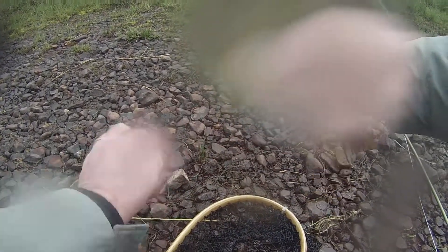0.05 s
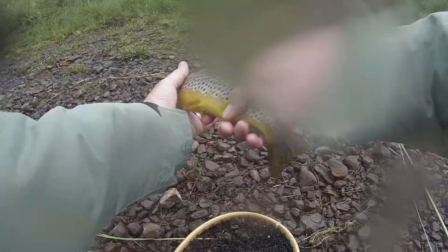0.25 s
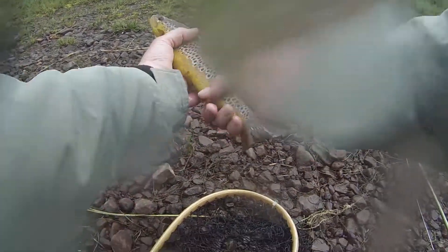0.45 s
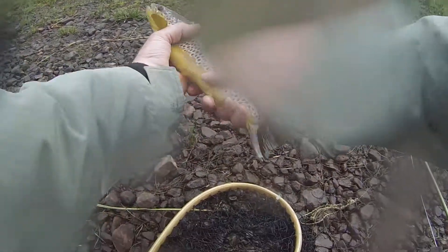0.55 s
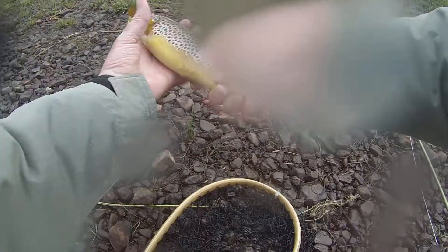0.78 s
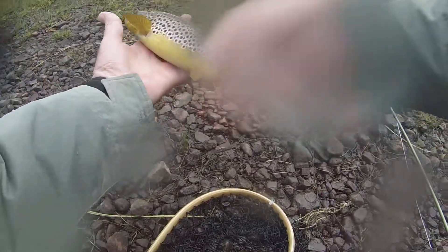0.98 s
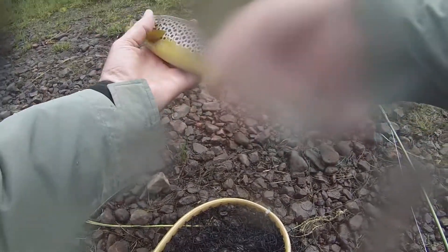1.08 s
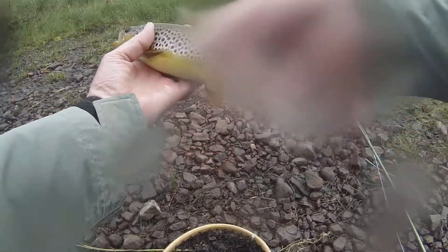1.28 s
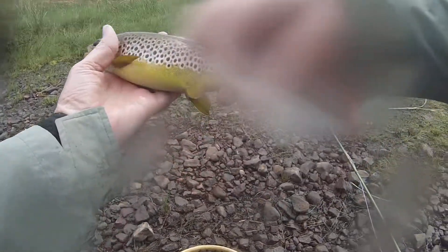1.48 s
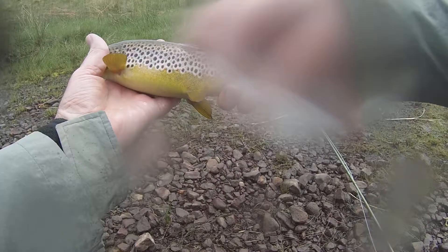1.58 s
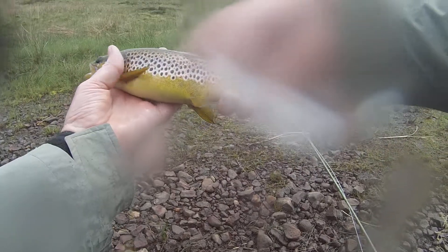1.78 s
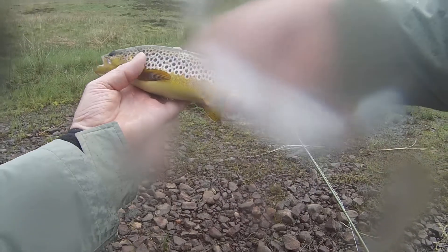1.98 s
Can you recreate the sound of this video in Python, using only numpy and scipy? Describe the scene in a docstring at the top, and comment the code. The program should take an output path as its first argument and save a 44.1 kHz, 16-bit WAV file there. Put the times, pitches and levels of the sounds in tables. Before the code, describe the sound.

Close knocks and rubs of a sleeve on the microphone, settling into a quiet jacket rustle.

```python
"""Someone lifts a fish on a stony lakeshore, heard from a small camera worn on the chest.
It opens on a faint wash of wind and water, a low rumble from the mount and a light jacket rustle.
In the first half second a sleeve drags over the case, shaking the mount, with a cluster of knocks,
tiny stick-slip squeaks and two raspy swishes. After the hardest knock, at 0.53 s, the cloth rustles
and ticks softly as the arms rise, with a few light bumps, two faint squeaks and thin, high chirps."""
import sys
import numpy as np
from scipy import signal
from scipy.fft import rfft, irfft
from scipy.io import wavfile
from scipy.ndimage import uniform_filter1d

SR = 44100
rng = np.random.default_rng(int(sys.argv[2]) if len(sys.argv) > 2 else 0)


def wrap_up_sound(samples):
    """Save the sound to the file named by the first command line argument, as 16-bit audio."""
    columns = np.atleast_2d(samples).T
    # keep every value between -1 and 1, then stretch to whole-number steps
    tamed = np.clip(columns, -1, 1)
    steps = np.round(tamed * 32767).astype(np.int16)
    wavfile.write(sys.argv[1], SR, steps)


N = 90404
T = np.arange(N) / SR
HIT_T = T[:SR // 5]  # time axis of a one-shot


def undb(db):
    """Decibels to gain."""
    return 10 ** (np.asarray(db) / 20)


def unit(x):
    """Normalise to rms 1."""
    return x / np.sqrt(np.mean(x ** 2))


def peak(x, db):
    """Normalise to a peak level."""
    return x * undb(db) / np.abs(x).max()


def fader(points):
    """Volume automation through (time [s], level [dB]) points."""
    return undb(np.interp(T, *np.array(points).T))


def eq(x, points):
    """Minimum-phase EQ through (frequency [Hz], gain [dB]) points."""
    hz, db = np.array(points).T
    size = 2 * N
    bin_hz = np.maximum(np.arange(N + 1) * SR / size, 1)
    gain = undb(np.interp(np.log(bin_hz), np.log(hz), db))
    cepstrum = irfft(np.log(gain))
    cepstrum[1:N] *= 2  # folded onto positive time: no pre-ring
    cepstrum[N + 1:] = 0
    return irfft(rfft(x, size) * np.exp(rfft(cepstrum)))[:N]


def rolloff(x, hz, kind="low", order=2):
    """Low-pass or high-pass filter."""
    return signal.sosfilt(signal.butter(order, min(hz, SR / 3), kind, fs=SR, output="sos"), x)


def add(out, start, sound):
    """Drop a one-shot on the track at a time in seconds."""
    i = max(int(start * SR), 0)
    out[i:i + len(sound)] += sound[:max(N - i, 0)]


def wander(rate_hz):
    """Random LFO with rms 1."""
    hold = int(SR / rate_hz)
    steps = np.repeat(rng.standard_normal(N // hold + 1), hold)
    return unit(uniform_filter1d(steps, hold)[:N])


def swell(centre, half_s):
    """Bell-shaped fade in and out around a moment."""
    return np.exp(-((T - centre) / half_s) ** 2)


def friction(slips_per_s, scatter_db):
    """Cloth grain: dense tiny slips of uneven size."""
    size = undb(scatter_db * np.minimum(rng.exponential(size=N), 4))
    slips = rng.random(N) < slips_per_s / SR
    return slips * size * np.sign(rng.standard_normal(N))


def ring(hz, t60, attack_s):
    """One struck mode: quick attack, exponential tail."""
    decay = np.exp(-np.log(1000) * HIT_T / t60)
    attack = 1 - np.exp(-HIT_T / attack_s)
    return np.sin(2 * np.pi * hz * HIT_T) * decay * attack


# tone of the wind and water (frequency [Hz], gain [dB])
SHORE_EQ = [(20, 15.5), (120, -5), (320, -9.5), (650, -7), (1500, -20.5), (3000, -22), (5500, -22.5),
            (7500, -21), (9800, -25.5), (12000, -21), (15000, -40.5)]
SHORE_BED_DB, SHORE_DRIFT_DB = -60.5, -0.87


def shore():
    """The ambience bed: a faint, slightly wavering wash of wind and water."""
    wash = unit(eq(rng.standard_normal(N), SHORE_EQ))
    return wash * undb(SHORE_BED_DB + SHORE_DRIFT_DB * wander(rate_hz=18))


# fader ride of the shaken mount (time [s], level [dB])
RUMBLE_FADER = [(0, -59), (0.10, -58), (0.118, -42.5), (0.195, -51), (0.228, -27), (0.288, -33.5),
                (0.315, -40), (0.355, -34), (0.385, -47), (0.44, -46), (0.56, -53), (0.83, -59),
                (0.92, -54), (1.45, -53), (1.66, -55.5), (1.86, -51.5), (1.97, -56), (2.05, -64)]
# tone of its rumble (frequency [Hz], gain [dB])
RUMBLE_EQ = [(20, -3.5), (45, -2), (70, -3), (110, 3), (200, -3.5), (310, -14), (430, -16), (650, -36),
             (1000, -24.5), (2500, -69)]


def mount_rumble():
    """The low end: body movement rumbles through the chest mount."""
    return unit(eq(rng.standard_normal(N), RUMBLE_EQ)) * fader(RUMBLE_FADER)


# fader ride of the dragging sleeve (time [s], level [dB])
DRAG_FADER = [(0, -64), (0.10, -63.5), (0.15, -47.5), (0.195, -51), (0.225, -36), (0.27, -31.5),
              (0.30, -35), (0.345, -43), (0.372, -53), (0.395, -43.5), (0.43, -48), (0.48, -64),
              (0.58, -61.5), (0.7, -74.5)]
# tone of its scrape (frequency [Hz], gain [dB])
DRAG_EQ = [(300, 14), (700, -8), (1000, -3.5), (1450, 3.5), (1800, 2), (2200, 7.5), (2520, -4),
           (3100, -1.5), (3950, -12.5), (4500, -10), (5600, -10.5), (6400, -21), (7300, -22), (9000, -32),
           (12500, -30.5), (16000, -72)]
JUDDER_HZ, JUDDER_WIDTH_HZ, JUDDER_DB = 301.2, 66, -7  # level relative to the scrape


def sleeve_drag():
    """Cloth scrapes over the case and sets the mount juddering at its resonance."""
    scrape = unit(eq(friction(slips_per_s=4500, scatter_db=2.5), DRAG_EQ))
    b, a = signal.iirpeak(JUDDER_HZ, JUDDER_HZ / JUDDER_WIDTH_HZ, fs=SR)
    resonance = signal.lfilter(b, a, rng.standard_normal(N))
    judder = unit(signal.lfilter(b, a, resonance))  # a second pass narrows the band
    return (scrape + undb(JUDDER_DB) * judder) * fader(DRAG_FADER)


# fader ride of the jacket (time [s], level [dB])
RUSTLE_FADER = [(0, -67.5), (0.5, -58), (0.68, -63), (0.8, -64.5), (0.9, -60), (1.05, -59), (1.2, -60.5),
                (1.35, -60), (1.52, -60), (1.62, -65), (1.82, -64), (2.05, -69)]
# tone of its rustle (frequency [Hz], gain [dB])
RUSTLE_EQ = [(300, -6), (750, -8.5), (1050, -8), (1500, -3), (1900, -5.5), (2230, 1.5), (2550, -6.5),
             (2950, -6.5), (3300, -8), (3950, -12.5), (4500, -8.5), (5000, -14.5), (5550, -12),
             (6300, -21.5), (7300, -19), (9500, -31), (16000, -26)]
RUSTLE_FLUTTER_DB = 0.7


def jacket_rustle():
    """Fine slips of cloth make a soft, uneven rustle as the arms rise."""
    rustle = unit(eq(friction(slips_per_s=3500, scatter_db=1.5), RUSTLE_EQ))
    flutter = undb(RUSTLE_FLUTTER_DB * wander(rate_hz=120))
    return rustle * fader(RUSTLE_FADER) * flutter


# hits on the case (time [s], clack peak [dB], brightness [Hz], thump peak [dB], thump pitch [Hz],
# bracket peak [dB])
KNOCK_CUES = [(0.1331, -43, 1620, -32.5, 147, -66), (0.1678, -36.5, 2200, -31.5, 164, -43),
              (0.2051, -10.5, 5730, -14.5, 128, -18.5), (0.2266, -43, 2370, -25.5, 211, -48),
              (0.2506, -19, 1900, -18.5, 186, -12.5), (0.2829, -25, 2000, -18.5, 237, -33),
              (0.4555, -45, 1930, -33.5, 79, -79), (0.5158, -40.5, 2980, -37.5, 206, -61),
              (0.5228, -34, 1880, -38, 169, -41), (0.5341, -6.5, 1890, -16.5, 199, -30),
              (0.651, -62, 2000, -45.5, 139, -62), (0.79, -67, 1510, -43.5, 118, -65),
              (0.899, -53, 1520, -39.5, 134, -49), (0.9377, -41, 3040, -55, 147, -61.5),
              (1.5252, -36.5, 2320, -41, 107, -43), (1.5758, -38, 1430, -37.5, 140, -40),
              (1.6392, -49, 1880, -47.5, 155.6, -46.5), (2.042, -59, 1360, -46.5, 171, -51)]
# modes of the case (frequency [Hz], level [dB])
CASE_MODES = [(1340, -17), (1400, -8), (2175, 0), (2690, -5), (2940, -4.5), (3400, -2), (3900, -7),
              (4600, -7), (5200, -5), (7130, -14), (9250, -16), (12000, -4)]
# hollow modes of the bracket that holds it (frequency [Hz], level [dB], t60 [s])
BRACKET_MODES = [(342.5, 6, 0.022), (502, 3, 0.013), (593, -7.5, .016), (822, -1.5, 0.014)]
CASE_T60_S, CASE_REF_HZ, CASE_DAMPING = 0.0115, 2175, 0.45  # higher modes die sooner
THUMP_T60_CYCLES, THUMP_LOW_CUT_HZ, MOUNT_HIGH_CUT_HZ = 4.3, 72.8, 1330


def knocks():
    """Each hit clacks the case (duller on soft contact), thumps the mount and rings the bracket."""
    case = 0
    for hz, db in CASE_MODES:
        t60 = CASE_T60_S * (CASE_REF_HZ / hz) ** CASE_DAMPING
        case += undb(db) * ring(hz, t60, attack_s=0.001)
    case += undb(-42.5) * ring(hz=1845, t60=0.14, attack_s=0.001)  # one faint mode rings on
    bracket = sum(undb(db) * ring(hz, t60, attack_s=0.00038) for hz, db, t60 in BRACKET_MODES)
    bracket = rolloff(bracket, MOUNT_HIGH_CUT_HZ)
    out = np.zeros(N)
    for start, clack_db, bright_hz, thump_db, thump_hz, bracket_db in KNOCK_CUES:
        thump = ring(thump_hz, THUMP_T60_CYCLES / thump_hz, attack_s=0.0012)
        thump = rolloff(thump, MOUNT_HIGH_CUT_HZ)
        thump = rolloff(thump, THUMP_LOW_CUT_HZ, "high", order=1)
        clack = rolloff(case, bright_hz, order=4)
        clack = rolloff(clack, 0.39 * bright_hz, "high", order=1)  # hard contact thins the low modes
        add(out, start, peak(clack, clack_db) - peak(thump, thump_db) + peak(bracket, bracket_db))
    return out


# ticks of creasing cloth (time [s], peak level [dB])
TICK_CUES = [(0.1456, -43), (0.153, -38), (0.593, -47), (0.612, -47), (0.702, -44), (0.7129, -45.5),
             (0.7476, -50.5), (1.046, -43.5), (1.053, -48), (1.1229, -45), (1.4251, -49)]
# tone of a tick (frequency [Hz], gain [dB])
TICK_EQ = [(300, -27), (1000, -7.5), (2200, 2.5), (3200, -6.5), (5400, -6.5), (6400, -17), (7500, -21),
           (10000, -35), (16000, -55)]
TICK_DECAY_S = 0.0026


def crease_ticks():
    """A tight burst of noise each time a crease gives way."""
    out = np.zeros(N)
    noise = eq(rng.standard_normal(N), TICK_EQ)
    for start, db in TICK_CUES:
        burst = np.roll(noise, -int(start * SR))[:len(HIT_T)]
        add(out, start, peak(burst * np.exp(-HIT_T / TICK_DECAY_S), db))
    return out


# cloth squeaks (time [s], peak level [dB], pitch [Hz])
SQUEAK_CUES = [(0.2303, -40.5, 5480), (0.2845, -24, 2290), (0.2895, -23.5, 2180), (0.2914, -25, 1444),
               (0.2975, -24.5, 2070), (0.3012, -36, 4320), (1.671, -49, 1710), (2.0285, -52, 1740)]
SQUEAK_TIME_CONSTANT_S = 0.00087


def cloth_squeaks():
    """The cloth sticks and slips, giving a few milliseconds of tone."""
    out = np.zeros(N)
    age = HIT_T / SQUEAK_TIME_CONSTANT_S
    envelope = age ** 2 * np.exp(-age)
    for start, db, hz in SQUEAK_CUES:
        add(out, start, peak(envelope * np.sin(2 * np.pi * hz * HIT_T), db))
    return out


# fastest slides of the sleeve (centre time [s], half-length [s], level [dB])
SWISH_CUES = [(0.308, 0.029, -42), (0.399, 0.025, -53)]
# tone of their rasp (frequency [Hz], gain [dB])
SWISH_EQ = [(1000, -22), (3000, 1.5), (3950, -3.5), (4500, -1), (5600, -6), (6400, -17), (7300, -14.5),
            (9000, -29), (12500, -28), (16000, -34)]


def sleeve_swishes():
    """A bright, raspy hiss swells where the sleeve slides fastest."""
    rasp = unit(eq(friction(slips_per_s=4500, scatter_db=2.5), SWISH_EQ))
    return rasp * sum(undb(db) * swell(centre, half_s) for centre, half_s, db in SWISH_CUES)


# very faint high chirps (centre time [s], level [dB])
CHIRP_CUES = [(0.555, -66), (0.584, -67.5), (0.921, -69), (1.648, -66), (1.712, -70), (1.734, -70),
              (1.883, -72)]


def chirps():
    """Brief wisps of narrow-band noise in the top end."""
    hiss = rolloff(rng.standard_normal(N), hz=11200, kind="high", order=8)
    band = unit(rolloff(hiss, hz=12700, order=8))
    return band * sum(undb(db) * swell(centre, half_s=0.006) for centre, db in CHIRP_CUES)


def scene():
    """Beds and spot effects, mixed to mono at the one microphone."""
    beds = shore() + mount_rumble() + sleeve_drag() + jacket_rustle()
    spots = knocks() + crease_ticks() + cloth_squeaks() + sleeve_swishes() + chirps()
    return (beds + spots)[None]


def record(dry):
    """The camera puts a steep high cut on the mix."""
    high_cut_hz = 15250
    return signal.sosfilt(signal.ellip(10, 0.2, 70, high_cut_hz, fs=SR, output="sos"), dry)


dry = scene()
out = record(dry)
wrap_up_sound(out)
```